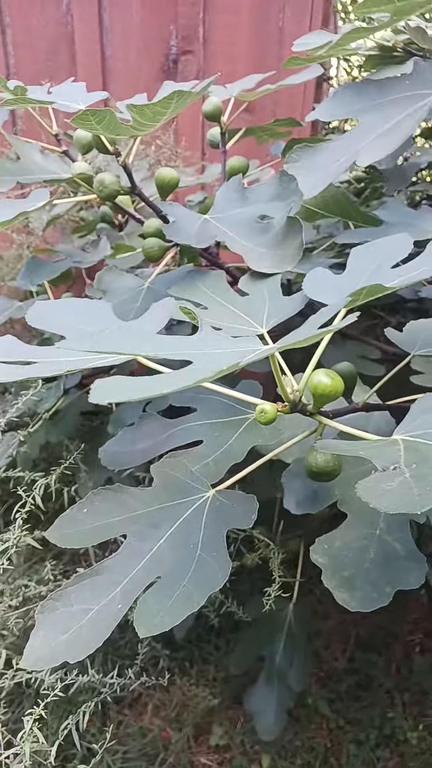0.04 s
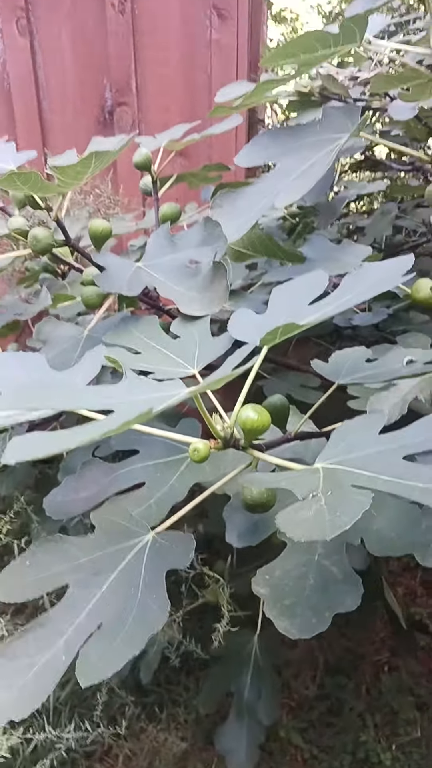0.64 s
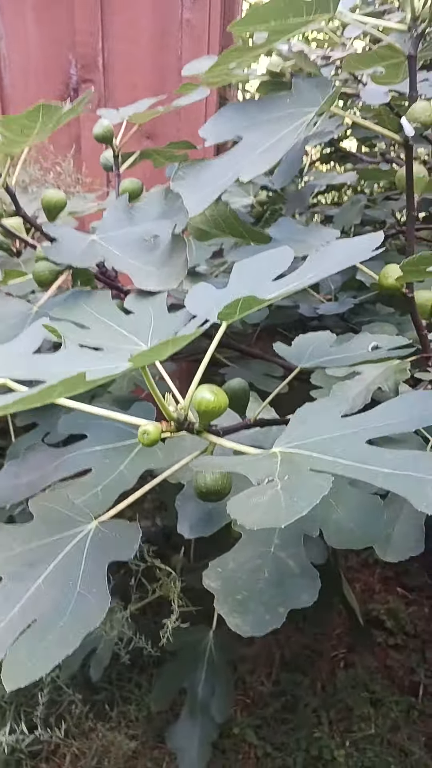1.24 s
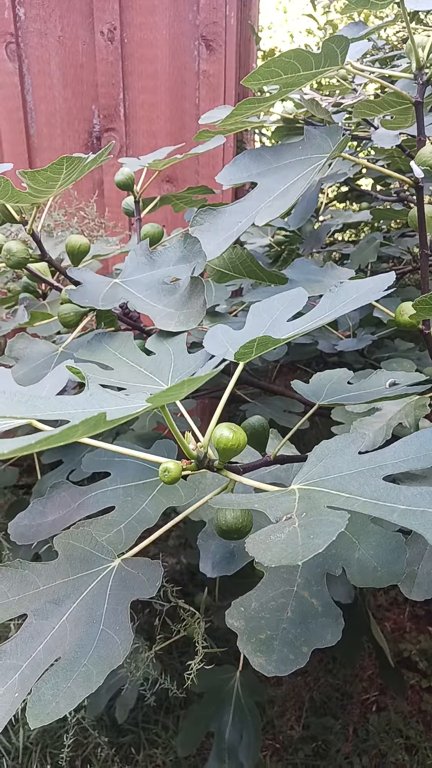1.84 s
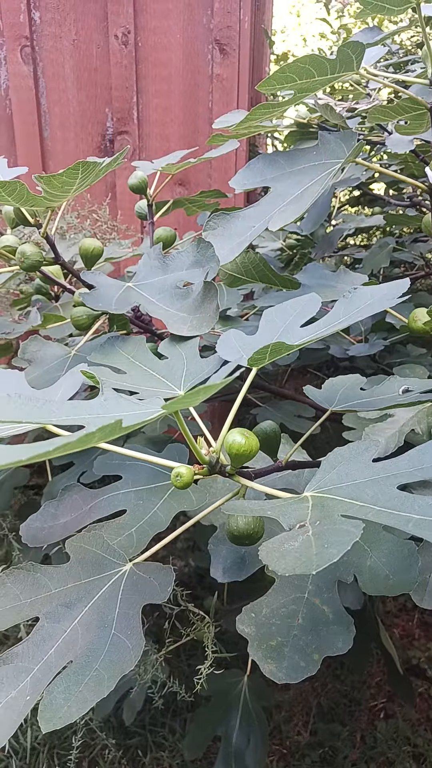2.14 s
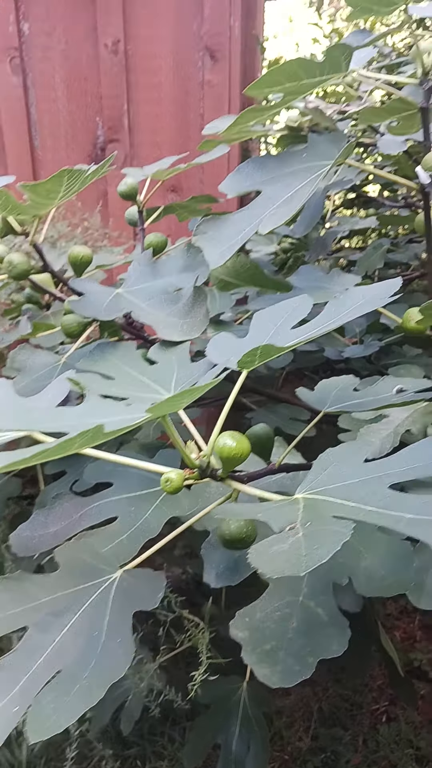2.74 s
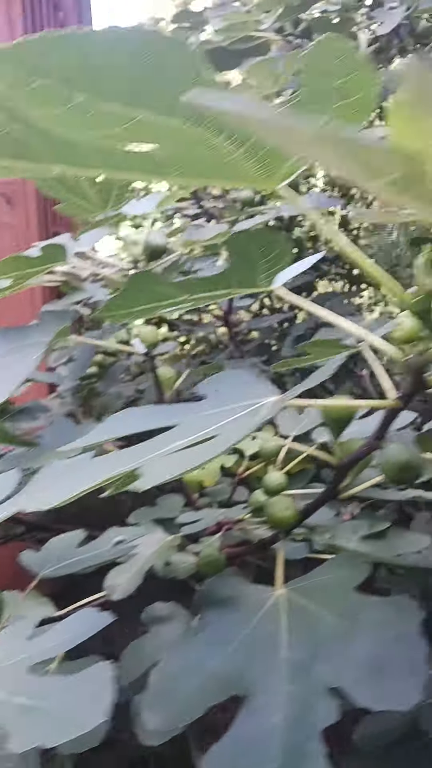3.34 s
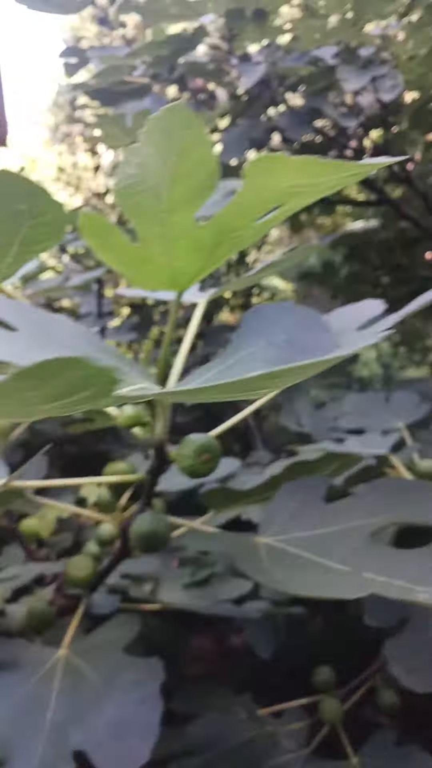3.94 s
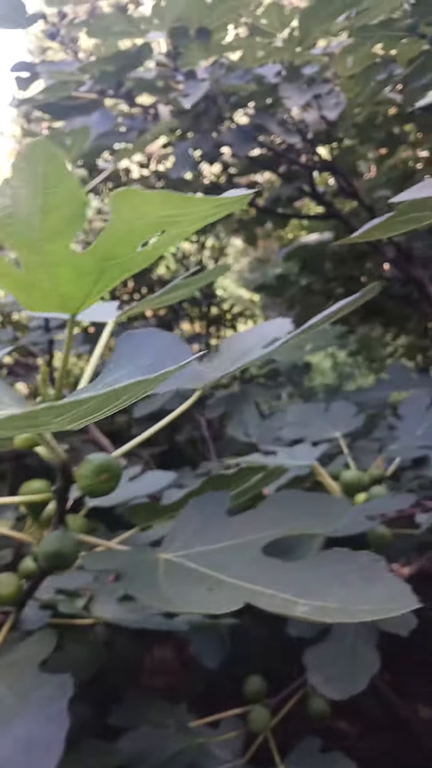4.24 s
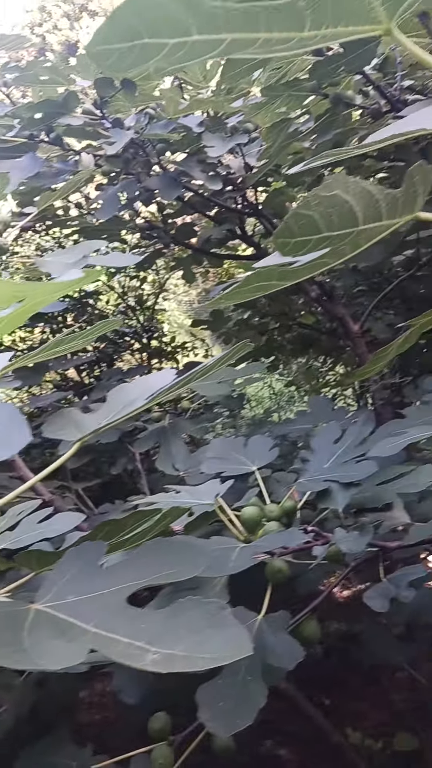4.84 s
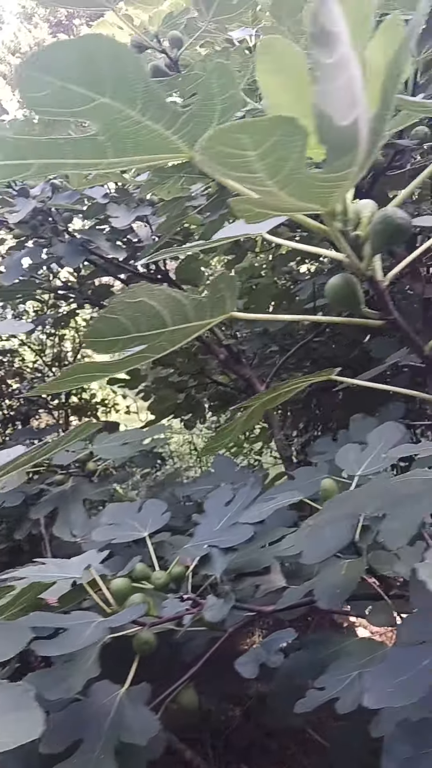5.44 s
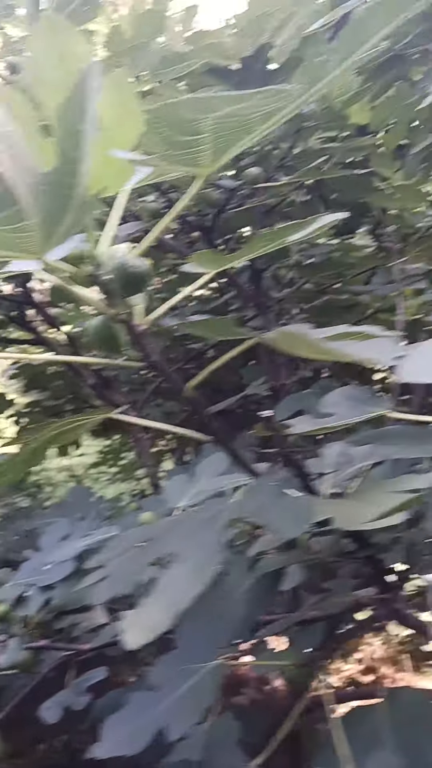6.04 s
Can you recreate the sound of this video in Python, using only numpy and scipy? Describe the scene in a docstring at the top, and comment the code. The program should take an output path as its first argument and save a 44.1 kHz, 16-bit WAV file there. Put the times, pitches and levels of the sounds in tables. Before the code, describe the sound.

In a backyard, a chorus of crickets holds a high trill on the left while two nearer ones chirp quickly. Fig leaves rustle and scrape against a hand-held phone on the right, with one sharp, crisp scrape early on. Midway a twig taps the case, and a small distant bird gives a falling whistle and six hoarse notes. Soft finger bumps, low handling rumble and faint hiss run throughout.

```python
"""Crickets by a backyard fig tree

A chorus of crickets trills on the left by rubbing their wings, and two nearer ones chirp about
six times a second. Leaves rustle and scrape past a hand-held phone, a twig taps it once, and
fingers bump its case. A small bird farther off gives one falling whistle and six hoarse notes.
Behind it all are the rumble of the hand, one brief low tone and a soft hiss."""
import sys
import numpy as np
from scipy import signal
from scipy.fft import rfft, irfft, next_fast_len
from scipy.io import wavfile
from scipy.ndimage import map_coordinates

SR = 44100
rng = np.random.default_rng(int(sys.argv[2]) if len(sys.argv) > 2 else 0)


def wav_record(signal):
    """Record a signal, one row per channel, as 16-bit PCM in the file named by sys.argv[1]."""
    frames = np.transpose(np.atleast_2d(signal))
    bounded = np.clip(frames, -1, 1)
    # unit amplitude maps onto the largest positive 16-bit level
    quanta = np.round(bounded * 32767).astype(np.int16)
    wavfile.write(sys.argv[1], SR, quanta)


N = 268569

# how the chorus's wings ring: (frequency [Hz], level [dB])
WING_COLOUR = [(5800, -54), (6500, -34), (6850, -20.5), (7150, -13), (7400, -5.5), (7620, -0.5), (7820, 0),
               (8030, -10.5), (8200, -17.5), (8600, -38), (9400, -63.5)]
# the phone turns away from the near crickets: (time [s], share of the turn [0-1])
PHONE_TURN = [(2.7, 0), (3.1, 0.93)]
# leaves sliding along the phone: (start [s], length [s], level [dB], left minus right [dB])
LEAF_SLIDES = [(.17, .45, -54.5, -6.5), (0.733, 0.34, -49.5, -10.5), (1.18, 0.085, -54, -15.5),
               (3.266, 0.57, -65.5, -9), (4.036, 0.054, -60.5, -13.5), (4.748, 0.11, -61.5, -12)]
# tone colour of the rustle: (frequency [Hz], level [dB])
RUSTLE_COLOUR = [(300, -18.5), (1250, -21.5), (1550, -7), (2300, -10.5), (2900, -13), (3500, -5),
                 (5200, 0.5), (6600, -5.5), (8700, -31), (9600, -8), (11500, 3.5), (14000, 0), (16000, -5)]
# single strokes of a leaf or finger on the case: (peak time [s], level [dB], fade time [s],
# brightness [dB per octave], hollow ring [dB], left minus right [dB])
SCRAPE_EVENTS = [(.43, -50.5, .024, 10, 13, 0), (.6, -55, 0.012, -2, 1, -11),
                 (.9, -50, .03, -1.5, 2, -23.5), (1.25, -18, .008, .5, 0.5, -20.5),
                 (1.568, -48, .018, -4, -4.5, -23), (2.15, -61, 0.081, -19.5, -10.5, -13),
                 (2.79, -46.5, 0.013, -9, -4, -20), (3.104, -37.5, .008, 5, 9, -12.5),
                 (3.501, -49, .013, .5, -9, -20), (3.83, -51.5, 0.041, 9, -24, -19)]
# leaf edges flicking free: (time [s], level [dB], brightness [dB per octave], left minus right [dB])
LEAF_FLICKS = [(0.215, -49.5, 4.5, -11.5), (0.796, -46, 5, -6), (.85, -40.5, 3.5, -19),
               (1.2384, -18, 4, -14), (5.339, -43, 10.5, -8.5)]
# tone colour of a scrape or flick: (frequency [Hz], level [dB])
STROKE_COLOUR = [(250, -20), (600, -20.5), (1200, -16.5), (1700, -7), (2400, -4.5), (3800, -6.5),
                 (4500, -1), (5700, 0.5), (6700, -21.5), (8700, -20.5), (9700, -13.5), (11900, -4),
                 (13500, -15), (15500, -15)]
# where the case and microphone opening ring: (frequency [Hz], width [Hz], boost [dB])
CASE_RINGS = [(1530, 41, 4.5), (2223, 230, 5.5), (2405, 70, 4.5), (2675, 59, 3.5), (3440, 99, 1.5),
              (4290, 38, 8.5), (4700, 19, 11), (5050, 27, 0), (5710, 64, 8.5), (10400, 83, 5.5),
              (11900, 120, 5), (12080, 170, 0)]
# tone colour of a twig's hard tap: (frequency [Hz], level [dB])
TAP_COLOUR = [(150, -14), (500, 5.5), (900, -6), (1440, 0.5), (2200, -12), (3000, -15.5), (3700, -25),
              (7000, -25.5), (11500, -12.5), (16000, -27.5)]
# firm finger bumps: (time [s], level [dB], knock compared with thud [dB], left minus right [dB])
FIRM_BUMPS = [(.109, -37.5, -5, -2.5), (.324, -41, -3.5, -2.5), (.68, -39, -2, -4),
              (1.062, -44, -10.5, 1.5), (1.252, -37.5, -11.5, -8.5), (1.465, -33.5, -7, -4.5),
              (1.517, -40, -1.5, -2.5), (2.125, -44.5, 8, -22), (2.778, -36.5, -1.5, -12),
              (2.881, -34, -3, -7), (2.989, -36, -7, -4.5), (3.359, -34.5, -6, -9),
              (4.135, -37.5, 1.5, -17), (4.305, -29.5, -7, -4.5), (4.73, -44, 3, -24),
              (4.871, -37.5, -13, -5.5), (5.013, -37, -7.5, -9.5), (5.17, -29.5, -14, -20),
              (5.388, -35, -8, -2.5), (5.885, -33.5, -8, -6.5), (6.021, -25.5, 1, -7.5)]
# a bump as the microphone passes it on: (frequency [Hz], level [dB])
THUD_COLOUR = [(20, -41.5), (35, -13), (50, 7), (65, 5.5), (90, -4.5), (140, -3.5), (250, -33), (450, -50),
               (1200, -77)]
# the case's own dull knock: (frequency [Hz], level [dB])
KNOCK_COLOUR = [(40, -26), (110, 1), (170, 4.5), (260, -1), (380, -10.5), (600, -24.5), (1200, -51.5),
                (3000, -66.5)]
# the bird's opening whistle: (time [s], pitch [Hz], level [dB])
BIRD_WHISTLE = [(2.66, 7500, -56), (2.69, 7120, -43), (2.73, 5800, -54), (2.76, 5700, -65)]
# its hoarse notes: (start [s], length [s], level [dB])
BIRD_NOTES = [(2.8, .14, -55.5), (2.946, 0.12, -53), (3.085, .11, -51), (3.253, .112, -48),
              (3.394, .12, -48.5), (3.547, 0.13, -47.5)]
# what its throat lets through: (frequency [Hz], level [dB])
THROAT_COLOUR = [(2900, -45.5), (3450, -19), (3850, -4), (4270, -3), (4700, -1), (5150, -11.5), (5550, -10),
                 (6500, -30.5)]
# how restless the holding hand is: (time [s], level [dB])
GRIP_LEVELS = [(0.0, -58.5), (0.75, -52), (1.34, -55), (1.71, -61), (2.05, -59), (2.36, -64.5), (3.07, -55),
               (3.88, -63.5), (5.17, -58.5), (5.53, -64.5), (5.68, -60.5), (6.09, -44.5)]
# tone colour of the hand's rumble: (frequency [Hz], level [dB])
GRIP_COLOUR = [(20, -29), (40, -3.5), (58, 6), (100, -2), (180, -11.5), (300, -22.5), (600, -40.5),
               (1500, -45), (4000, -67.5)]
# how the high hiss rises and falls: (time [s], level [dB])
HISS_LEVELS = [(0, -59.5), (1.85, -58.5), (2.24, -64), (3.3, -64), (4.6, -62), (5.2, -65.5), (6.09, -63.5)]
# tone colour of that hiss: (frequency [Hz], level [dB])
HISS_COLOUR = [(3000, -42.5), (5500, -16.5), (9500, -25), (11000, -0.5), (12500, 6), (15700, 5.5)]
# tone colour of the quiet garden air: (frequency [Hz], level [dB])
AIR_COLOUR = [(30, 7), (150, -6.5), (400, -11.5), (700, -15), (1300, -18), (1470, -15.5), (1650, -20.5),
              (3000, -36.5), (6000, -11.5), (16000, -30)]


def cricket_chorus(count=8, start_db=-42, rise_db_per_s=0.5667, waver_db=0.67):
    """Many crickets rub their wings, each at its own speed, and blend into one high trill."""
    t = clock()
    rasp = 0
    for strokes_per_s in rng.uniform(28, 95, count):
        rasp += noise_pair(0.19) * (1 + 0.35 * np.sin(2 * np.pi * (strokes_per_s * t + 0.26 * wobble(3))))
    # louder as the phone moves closer, with a dip as a leaf passes over the microphone
    left_db = start_db + rise_db_per_s * t + waver_db * wobble(7) - 5 * hump(3.53, .06)
    # the right microphone faces away and hears only steady, scattered sound
    right_db = -61.5 + .6 * wobble(3.5)
    return coloured(rasp, WING_COLOUR) * amp([left_db, right_db])


def chirping(chirps, wing_hz, sag_hz, length, octave_db):
    """Each chirp is one closing of the wings: a clear tone, lower at both ends where they move slowly."""
    progress = np.linspace(0, 1, int(length * SR))
    swell = signal.windows.tukey(len(progress), .45)
    sag = sag_hz * (progress ** 5 + 0.38 * (1 - progress) ** 5)
    song = np.zeros(N)
    for (s, db), drift_hz in zip(chirps, rng.normal(0, 4.9, len(chirps))):
        phase = phase_of(wing_hz + drift_hz - sag)
        tone = np.sin(phase) + amp(octave_db) * progress * np.sin(2 * phase)
        add(song, s - length * 0.41, amp(db) * swell * tone)
    return song


def near_crickets(left_beat_s=.16218, right_beat_s=.1585):
    """One cricket chirps on the left; a fainter, higher one keeps its own beat a little to the right."""
    turn = np.transpose(PHONE_TURN)  # both grow fainter as the phone turns away
    left_chirps = [(s + rng.normal(0, .002), -49 - np.interp(s, *turn) + rng.normal(0, 1.56))
                   for s in np.arange(.0862, N / SR, left_beat_s)]
    right_chirps = [(s, -59 - 6 * np.interp(s, *turn)) for s in np.arange(.09, N / SR, right_beat_s)]
    left = chirping(left_chirps, wing_hz=6759, sag_hz=240, length=0.043, octave_db=-13.5)
    right = chirping(right_chirps, wing_hz=7230, sag_hz=90, length=.03, octave_db=-2)
    return garden_echo(left, fade_s=0.11, echo_db=-17) * sides(0.99, -10) + right * sides(-1, 0.63)


def leaf_rustle(rise_s=.03, fall_s=.04, grain_db=2, patchy_db=1.5):
    """Rough leaves slide in tiny uneven slips, mostly by the right microphone."""
    t = clock()
    pressure = amp(-70) * sides(-9.5, 0)  # the leaves always stir faintly
    for s, length, db, pan_db in LEAF_SLIDES:
        swell = np.exp(np.minimum(t - s, 0) / rise_s - np.maximum(t - s - length, 0) / fall_s)
        pressure = pressure + amp(db) * swell * sides(pan_db, 0)
    slips = unit(noise_pair(0.16) * amp(grain_db * wobble(900) + patchy_db * wobble(45)))
    return coloured(on_case(slips), RUSTLE_COLOUR) * pressure * amp(wobble(9))


def stroke(rise, fall, bright_db, hollow_db, hollow_hz=2280, width_hz=330):
    """A gritty rub on the case: half a second of sound that peaks in its middle."""
    t = np.arange(SR // 2) / SR
    t = t - t.mean()
    noise = rng.standard_normal(len(t)) + .5 * rng.standard_normal((2, len(t)))
    grit = on_case(noise * amp(1.6 * wobble(900)[:len(t)]))
    grit = filtered(grit, lambda hz: amp(ring_db(hz, hollow_hz, width_hz, hollow_db)))
    from_peak = np.where(t < 0, t / rise, t / fall)
    swell = np.exp(1.16 * (1 - np.hypot(1, from_peak)))
    return swell * coloured(grit, STROKE_COLOUR, bright_db)


def leaf_scrapes(drag_db=-25):
    """A leaf catches on the case, then drags more dully as it slows; a stiff one also rings hollow."""
    out = np.zeros((2, N))
    for s, db, fade, bright_db, hollow_db, pan_db in SCRAPE_EVENTS:
        catch = centred(s, stroke(0.91 * fade, fade, bright_db, hollow_db))
        drag = centred(s + 2.9 * fade, stroke(2.18 * fade, 2.18 * fade, bright_db - 12, 0))
        out += amp(db) * (catch + amp(drag_db) * drag) * sides(pan_db, 0)
    return out


def leaf_flicks(rise_s=.0009, fall_s=.0039):
    """A leaf edge springs free: a very short, crisp stroke."""
    out = np.zeros((2, N))
    for s, db, bright_db, pan_db in LEAF_FLICKS:
        out += amp(db) * centred(s, stroke(rise_s, fall_s, bright_db, hollow_db=-2)) * sides(pan_db, 0)
    return out


def twig_tap(s=2.768, db=-27):
    """A twig strikes the case once, dry and sharp."""
    out = np.zeros((2, N))
    add(out, s, amp(db) * impulse(TAP_COLOUR) * sides(-12, 0))
    return out


def finger_bumps(scuff_s=.016, scuff_db=-12):
    """Fingers push on the case: a low thud, a dull knock if the touch is hard, and a scuff of skin."""
    out = np.zeros((2, N))
    thud, knock = impulse(THUD_COLOUR), impulse(KNOCK_COLOUR)
    age = np.arange(len(thud)) / SR / scuff_s
    for s, db, knock_db, pan_db in FIRM_BUMPS + light_touches():
        scuff = coloured(rng.standard_normal((2, len(age))), KNOCK_COLOUR) * age * np.exp(1 - age)
        # the softer the touch, the longer the fingertip spreads its push
        fingertip = np.hanning(3 + int(SR * 0.0026 * amp(-knock_db * .5)))
        hit = amp(3) * thud + amp(knock_db + 1) * knock
        push = signal.fftconvolve(hit, fingertip / fingertip.sum())[:len(thud)]
        bump = push + amp(knock_db + scuff_db) * scuff
        add(out, s - len(fingertip) / 2 / SR, amp(db) * bump * sides(pan_db, 0))
    return out


def light_touches(per_s=3, scatter_db=2, knock_db=-0.5, pan_db=-5.5):
    """Rows like FIRM_BUMPS for light touches at random times, stronger when the hand is restless."""
    slots = np.arange(0, N / SR, 1 / per_s)
    shift, strength = rng.uniform(-0.8, 1, (len(slots), 2)).T
    times = np.clip(slots + shift / 2 / per_s, 0, N / SR)
    levels = np.interp(times, *np.transpose(GRIP_LEVELS)) + 6 + scatter_db * strength
    return [(s, db, knock_db, pan_db) for s, db in zip(times, levels)]


def bird(buzz_hz=427.5):
    """A falling whistle, then hoarse notes: high overtones of a low buzz, shaped by the throat."""
    t = clock()
    whistling = (t > BIRD_WHISTLE[0][0]) & (t < BIRD_WHISTLE[-1][0])
    glide = curve(BIRD_WHISTLE) * (1 + 0.033 * wobble(520))
    call = whistling * amp(curve(BIRD_WHISTLE, column=2)) * np.sin(phase_of(glide))
    for s, length, db in BIRD_NOTES:
        size = int(length * SR)
        progress = np.linspace(0, 1, size)
        off_pitch = rng.normal(0, .012)
        arch = -rng.uniform(.16, .3) * (progress - .7) ** 2  # the pitch rises, then drops a little
        pitch = buzz_hz * (1 + off_pitch + arch + .008 * wobble(400)[:size])
        phase = phase_of(pitch)
        overtones = 0
        for k in range(7, 16):
            gain = amp(level_at(THROAT_COLOUR, k * pitch) + rng.normal(0, 2))
            overtones += gain * np.sin(k * phase + rng.uniform(0, 2 * np.pi))
        hoarse = unit(overtones) + amp(-4) * coloured(rng.standard_normal(size), THROAT_COLOUR)
        swell = amp(db - 7 + 1.6 * progress) * np.sqrt(np.hanning(size))
        add(call, s, swell * hoarse)
    return garden_echo(call, fade_s=.25, echo_db=-5)


def hand_rumble():
    """The holding hand rumbles unevenly through the case."""
    lumps = unit(noise_pair(0.61) * amp(3.5 * wobble(22)))
    return coloured(lumps, GRIP_COLOUR) * amp(curve(GRIP_LEVELS) + 3.5) * sides(-6, 3.4)


def low_tone(s=2.03, pitch_hz=448, sink_hz_per_s=820, fuzz_hz=25):
    """A faint, fuzzy low tone swells briefly while its pitch sinks."""
    pitch = pitch_hz - sink_hz_per_s * (clock() - s) + fuzz_hz * wobble(83)
    return amp(-60) * hump(s, .045) * np.sin(phase_of(pitch)) * sides(0.95, -15)


def garden_air():
    """Quiet outdoor air and a fine high hiss."""
    hiss = coloured(noise_pair(0.12), HISS_COLOUR) * amp(curve(HISS_LEVELS)) * sides(6.6, -2.5)
    return hiss + amp(-67) * coloured(noise_pair(0.1), AIR_COLOUR) * sides(-1.1, 1)


def garden_echo(x, fade_s, echo_db):
    """A sound plus its bounces off leaves and fence, which fall by 60 dB in fade_s."""
    t = np.arange(SR // 2) / SR
    tail = rng.standard_normal((2, len(t))) * amp(-60 * t / fade_s)
    echo = signal.fftconvolve(x[None], tail / np.linalg.norm(tail[0]), axes=1)[:, :N]
    return x + amp(echo_db) * echo


def on_case(x):
    """The phone's case rings along with whatever rubs on it."""
    return filtered(x, lambda hz: amp(sum(ring_db(hz, *ring) for ring in CASE_RINGS)))


def ring_db(hz, centre, width, db):
    """A boost that is strongest at one frequency."""
    return db / (1 + (2 * (hz - centre) / width) ** 2)


def amp(db):
    """Turn decibels into a gain."""
    return 10 ** (np.asarray(db) / 20)


def sides(left_db, right_db):
    """Gains for the left and right microphones."""
    return amp([[left_db], [right_db]])


def unit(x):
    """Scale a sound to an average (rms) size of 1."""
    return x / np.sqrt(np.mean(x ** 2) + 1e-20)


def clock():
    """The time of every sample, in seconds."""
    return np.arange(N) / SR


def phase_of(hz):
    """The running angle of a wave with this changing pitch."""
    return 2 * np.pi * np.cumsum(hz) / SR


def curve(rows, column=1):
    """Join one column of a timed table with straight lines."""
    rows = np.array(rows)
    return np.interp(clock(), rows[:, 0], rows[:, column])


def hump(s, width):
    """A smooth rise to 1 and back around time s."""
    return np.exp(-((clock() - s) / width) ** 2)


def wobble(rate):
    """A smooth curve through rate random points a second."""
    return map_coordinates(rng.standard_normal(int(N * rate / SR) + 4), [clock() * rate])


def noise_pair(alike):
    """Left and right white noise, from unrelated (0) to the same (1)."""
    return np.sqrt(alike) * rng.standard_normal(N) + np.sqrt(1 - alike) * rng.standard_normal((2, N))


def level_at(colour, hz):
    """Read a tone colour's level in dB at any frequency."""
    frequencies, levels = np.transpose(colour)
    return np.interp(np.log(hz + 1), np.log(frequencies + 1), levels)


def filtered(x, response):
    """Scale each frequency in x by response(hz)."""
    size = x.shape[-1]
    padded = next_fast_len(size + 8192)
    return irfft(rfft(x, padded) * response(np.fft.rfftfreq(padded, 1 / SR)), padded)[..., :size]


def coloured(x, colour, tilt_db=0):
    """Give x a tone colour, tilted by tilt_db per octave above 500 Hz, at an average size of 1."""
    def response(hz):
        return amp(level_at(colour, hz) + tilt_db * np.log2(np.maximum(hz, 500) / SR))
    return unit(filtered(x, response))


def impulse(colour, size=16384):
    """A sudden pulse with this tone colour and a peak of 1."""
    cepstrum = irfft(np.log(amp(level_at(colour, np.fft.rfftfreq(size, 1 / SR)))))
    # folding onto the first half packs the energy at the pulse's start
    cepstrum[1:size // 2] *= 2
    cepstrum[size // 2 + 1:] = 0
    pulse = irfft(np.exp(rfft(cepstrum)))
    return pulse / np.abs(pulse).max()


def add(track, s, sound):
    """Mix a sound into a track from time s."""
    start = max(round(s * SR), 0)
    room = track[..., start:start + sound.shape[-1]]
    room += sound[..., :room.shape[-1]]


def centred(s, sound):
    """A track with the middle of a sound at time s."""
    return np.pad(sound, ((0, 0), (round(s * SR), N)))[:, sound.shape[-1] // 2:][:, :N]


def scene():
    """Everything as it reaches the two microphones."""
    outdoors = cricket_chorus() + near_crickets() + bird() + low_tone() + garden_air()
    fig_tree = leaf_rustle() + leaf_scrapes() + leaf_flicks() + twig_tap()
    return outdoors + fig_tree + finger_bumps() + hand_rumble()


def record(dry, top_hz=15780):
    """The phone keeps nothing above its highest frequency."""
    return filtered(dry, lambda hz: hz < top_hz)


dry = scene()
out = record(dry)
wav_record(out)
```